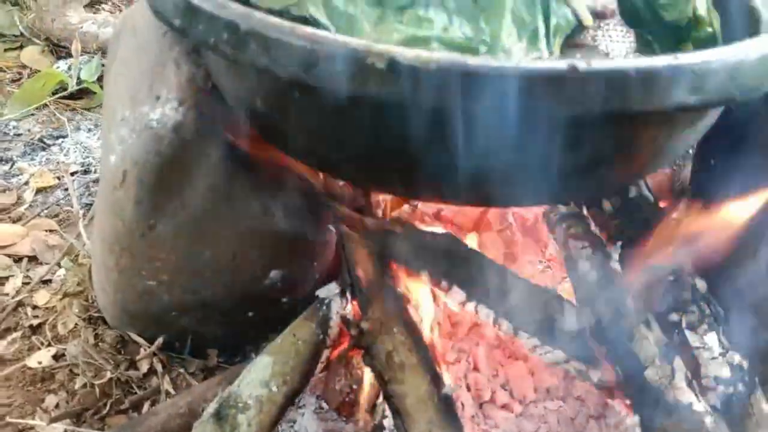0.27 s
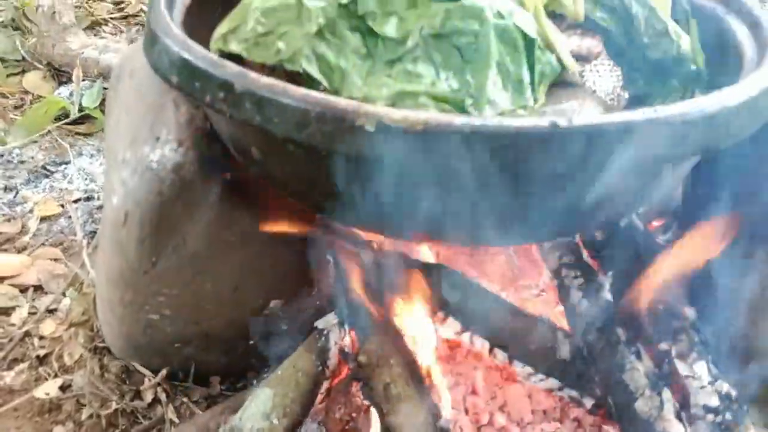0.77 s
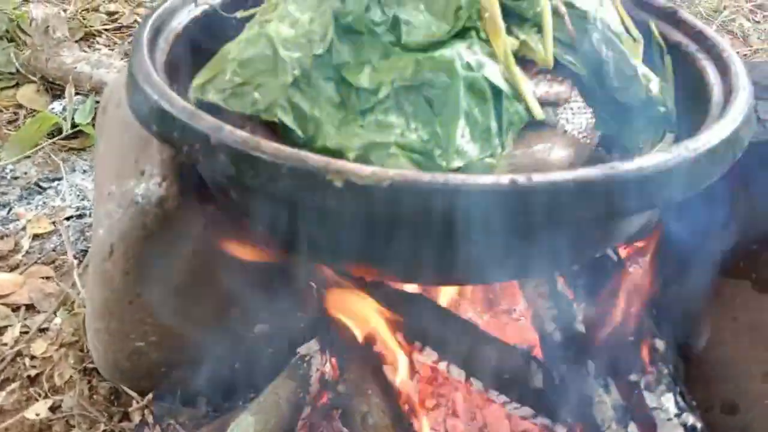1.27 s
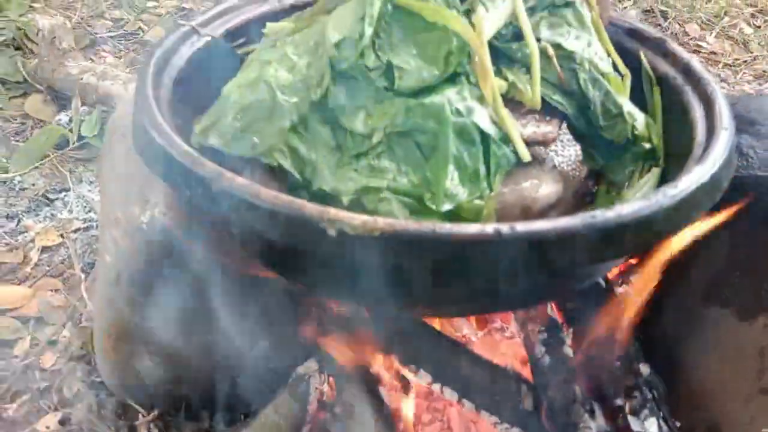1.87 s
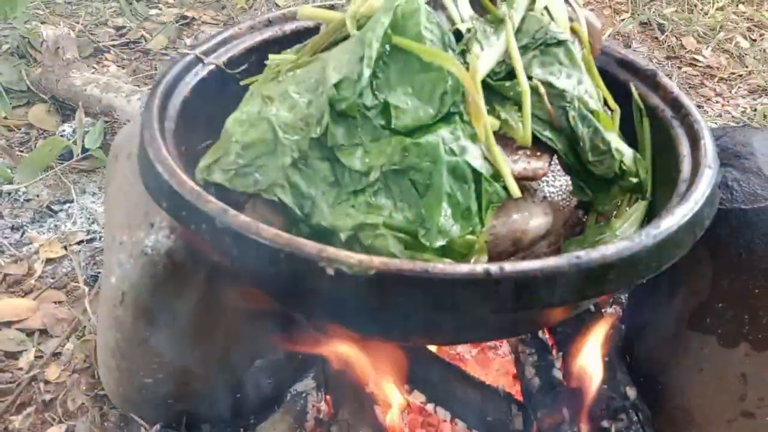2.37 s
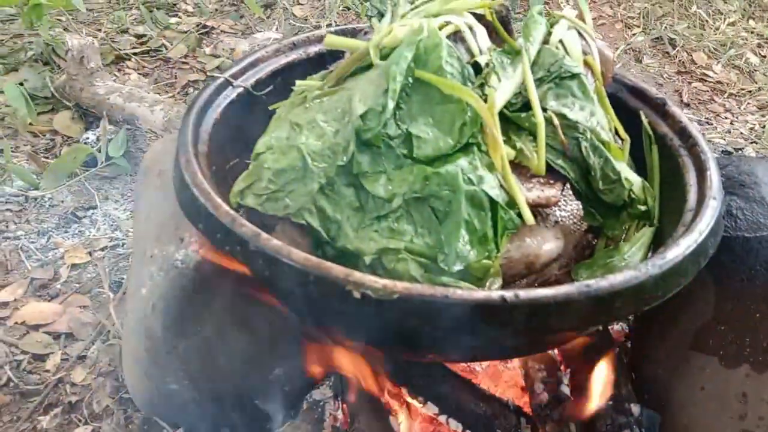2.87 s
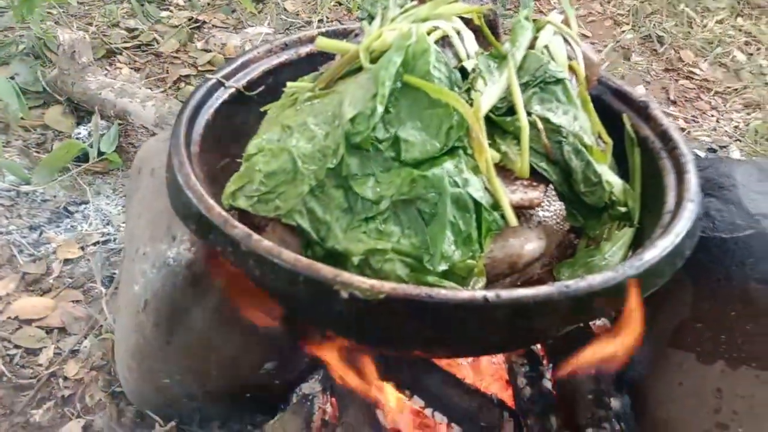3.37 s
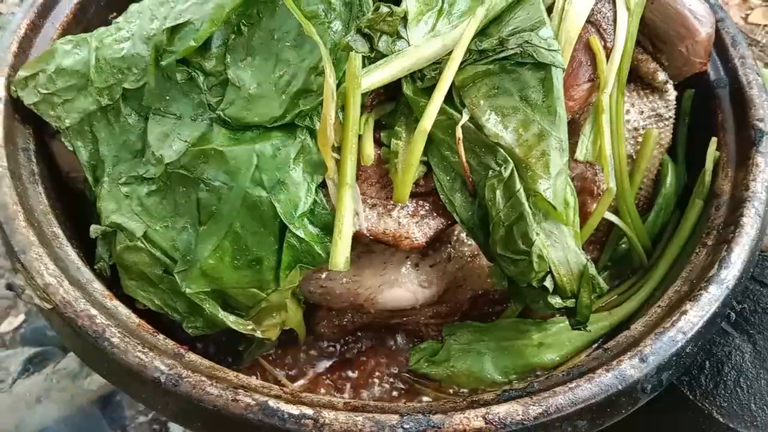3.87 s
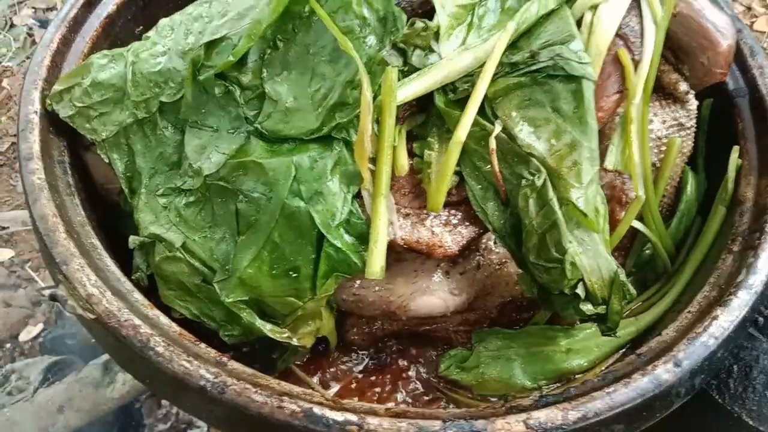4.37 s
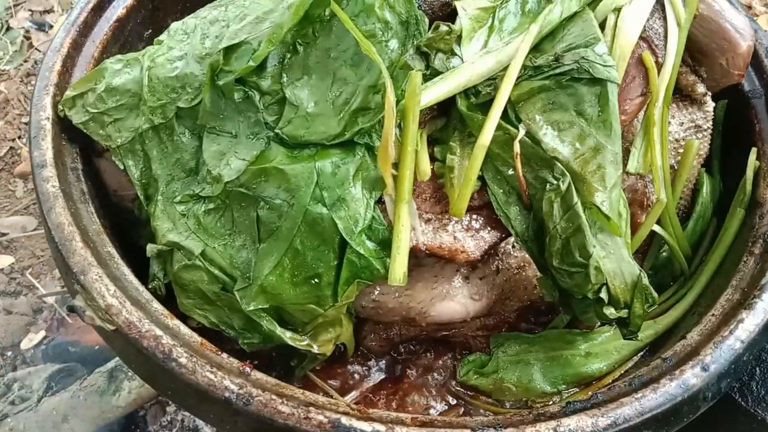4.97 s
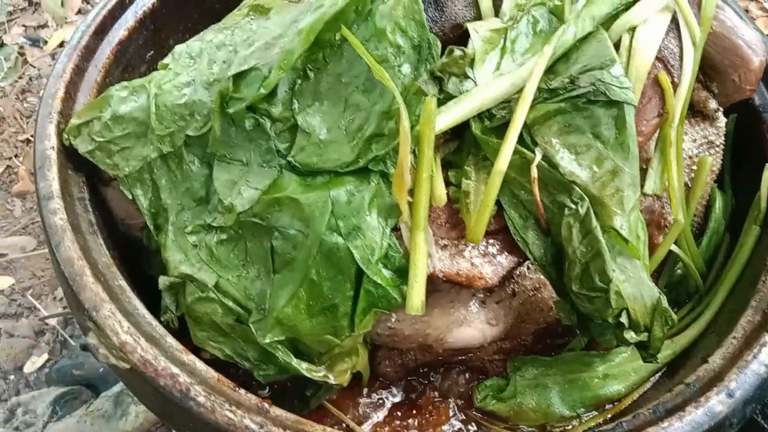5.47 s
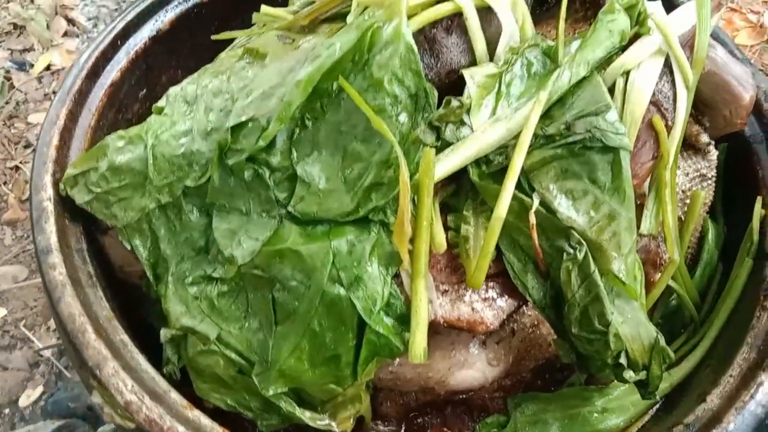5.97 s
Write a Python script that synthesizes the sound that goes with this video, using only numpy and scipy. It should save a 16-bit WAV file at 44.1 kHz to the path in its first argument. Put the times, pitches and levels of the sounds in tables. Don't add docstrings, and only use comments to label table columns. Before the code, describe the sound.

Faint uneven sizzling and soft flame flutter outdoors, a brief silent gap, then stronger seething with sharp spits, cracks and wet plops.

```python
import sys
import numpy as np
from scipy import signal
from scipy.fft import rfft, irfft, next_fast_len
from scipy.io import wavfile
from scipy.ndimage import uniform_filter1d, map_coordinates

SR = 44100
rng = np.random.default_rng(int(sys.argv[2]) if len(sys.argv) > 2 else 0)


def to_wav(s):
    ch = np.atleast_2d(s).T
    pcm = np.round(np.clip(ch, -1, 1) * 32767)
    wavfile.write(sys.argv[1], SR, pcm.astype(np.int16))


def linear_from_db(decibels):
    return 10 ** (np.asarray(decibels, float) / 20)


N = 275184

CUT_S, FADE_IN_S, FULL_S = 3.5445, 3.597, 3.8
STEP = 64
REFERENCE_DB = -46

# time in seconds, level in dB.
VIGOUR_SIDE = [(0, -51.5), (1.1, -51.5), (1.4, -48.5), (1.9, -48), (2.4, -47.5), (2.85, -45), (3.5, -44.5)]
VIGOUR_ABOVE = [(3.8, -40.5), (4.1, -38.5), (5.2, -38.5), (6.24, -37)]
# dB over the vigour, dB of growth per dB of vigour.
BOIL_BALANCE = [(-3, 0.94), (1, 0.64)]
SPATTER_BALANCE = [(-11, 1.23), (-8.5, 0.86)]
# middle in seconds,
# length in seconds, large bubbles in dB, small bubbles in dB.
SURGES = [(0.147, 0.036, 0.5, 3.5), (.19, .04, -4, -2.5), (.23, .04, 0.5, 0.5), (0.334, 0.042, 3, 4.5),
          (.46, .08, -1, 0.5), (0.61, 0.075, 4, 1.5), (.73, 0.066, 1, 4), (0.795, 0.035, 3, -0.5),
          (1.206, 0.067, 4, 2.5), (1.525, 0.022, 2, 5), (1.572, 0.12, -1.5, -2), (1.754, .11, 4, 2),
          (2.02, 0.066, 0.2, 4), (2.106, .08, 3, 2), (2.22, .06, -1.5, 0), (2.273, 0.046, 3, .3),
          (2.36, 0.062, 0.2, 5), (2.454, .05, 3, 0.5), (2.495, .05, -3.5, 1.5), (2.546, 0.076, 4, 0.5),
          (2.63, .06, -1.7, -0.5), (2.702, 0.035, -1.2, 1), (2.824, 0.083, -1.5, 1.1),
          (3.085, 0.073, 0.5, 0.5), (3.204, 0.065, -2.2, 3), (3.277, .12, -1.5, 0.5),
          (3.394, 0.12, -2, -5.5), (3.506, .1, -3, -0.5),
          (4.04, 0.099, -0.2, 2.1), (4.42, 0.14, 1, 0.5), (4.51, 0.058, -2, 0.63),
                (4.78, 0.039, 1.5, 2.1), (4.87, 0.024, 3, 2.7), (5.0, 0.075, .3, 2.1),
                (5.12, 0.084, 1.1, 1.3), (5.17, 0.036, -2.5, 2.4), (5.24, 0.051, 1.5, .3),
                (5.52, 0.09, 1.5, 1.5), (5.72, .08, -.6, 2.1), (5.93, .1, -0.1, 2.3),
                (5.99, .05, 1.5, 0.26), (6.06, 0.056, -1.2, 1.3)]
# middle in seconds, length in seconds, level in dB.
SHADES = [(.27, .05, -2.5), (0.475, .14, -4.5), (.87, 0.14, -4.5), (1.35, .1, -3), (1.705, .12, -6),
          (2.067, 0.066, -2), (2.68, .12, -2.5), (3.423, 0.083, -4), (5.715, 0.076, 2.1)]
# changes per second, depth in dB.
SEETHE = [(20, -0.82), (45, 0.05), (110, 0.8), (300, -0.43)]
# middle in seconds, length in seconds, level in dB.
GURGLES = [(.18, .05, 1), (.38, .05, 11), (.57, .08, 10), (.8, .15, 6), (0.957, .09, 9), (1.15, .16, 5),
           (1.56, .08, 0), (1.77, .15, 6), (1.94, .07, 12), (2.46, .08, 11), (2.71, .1, 8), (2.88, .07, 11),
           (2.983, .07, 15), (3.43, .1, 10), (3.53, .06, 6), (2.1, 0.11, 12), (3.15, 0.18, 0),
           (3.62, .06, -15), (4.28, 0.052, 1), (4.97, .08, -7), (5.147, 0.067, -11), (5.432, 0.095, 3),
           (5.543, 0.057, -13), (5.63, .08, 0)]
# pitch in Hz, width in Hz, level in dB.
POT_MODES = [(881, 200, -0.5), (1220, 127, -4), (1546, 292, -0.5), (1931, 160, -4), (2265, 57, -7)]
# frequency in Hz, density in dB per Hz.
HOLLOW_TONE = [(180, -62), (300, -39), (371, -34.5), (511, -6.5), (632, -1), (796, -3.5), (1080, 0),
               (1270, -1), (1380, -2.5), (1620, -1.5), (2170, -8.5), (2500, -14.5), (3250, -51.5),
               (5500, -120)]
# frequency in Hz, density in dB per Hz.
SPATTER_TONE_SIDE = [(2300, -35), (2480, 0), (2620, -20), (2800, -3), (3010, -15.5), (3270, -2),
                     (3500, -8.5), (3850, -1), (4150, -2), (4400, 0.5), (4600, -3.5), (4800, -37),
                     (5200, -53)]
SPATTER_TONE_ABOVE = [(2200, -49), (2560, -8), (2850, -2), (3090, -7.5), (3340, -1.5), (3960, 2),
                      (4400, 0.5), (4650, -4), (4900, -27), (5400, -50)]
# frequency in Hz, density in dB per Hz.
FIZZ_TONE_SIDE = [(4200, -40), (4800, -14.5), (5400, -5.5), (6050, -8.5), (7710, 0), (8710, -5.5),
                  (9350, -15), (10800, -10), (12500, -17.5), (13900, -36), (15000, -28), (15700, -16)]
FIZZ_TONE_ABOVE = [(4300, -39), (4900, -11), (5400, -3.5), (6300, -4.5), (7700, 3), (8200, 0), (9330, -12),
                   (10900, -9.5), (12700, -14.5), (13900, -34.5), (14900, -21.5), (15700, -22)]
# frequency in Hz, density in dB per Hz.
PRICKLE_TONE = [(8500, -40), (10000, -1), (12000, -8), (14000, -9), (15700, -21)]
# frequency in Hz, density in dB per Hz.
FLUTTER_TONE_SIDE = [(34, -38), (58, -16), (75, 2.5), (114, 6.5), (178, -16), (216, -15), (265, -16),
                     (300, -10), (390, -56), (660, -120)]
FLUTTER_TONE_ABOVE = [(34, -29), (58, -19), (97, 1), (124, 1.5), (147, -2.5), (211, -15.5), (242, -33),
                      (300, -39), (390, -48), (660, -120)]
# start in seconds, length in seconds, flutter in dB, throb in dB.
GUSTS = [(0, 0.028, -67, -110), (.17, .16, -82, -91), (.46, 0.58, -77.5, -85), (1.003, 0.64, -67.5, -62.5),
         (1.67, 0.12, -71, -73), (1.8, 0.14, -66.5, -66), (2.0, .17, -75, -76), (2.3, .09, -71, -86),
         (2.407, 0.29, -74, -97), (2.777, .06, -63, -89), (2.89, 0.46, -67, -88), (3.35, .18, -77, -95),
         (3.796, 0.2, -60, -60), (3.978, 0.22, -53.5, -64), (4.27, .13, -52, -88), (4.417, 0.089, -56, -72),
         (4.517, 0.455, -53, -60), (4.97, 0.12, -57, -69), (5.067, .17, -55.5, -62),
         (5.322, 0.13, -52.5, -68), (5.51, 0.039, -51.5, -80), (5.596, 0.19, -54, -58),
         (5.766, 0.25, -57, -56), (6.02, .19, -62.5, -60.5)]
# level beside in dB, level above in dB.
EMBERS = [(-84, -68.5), (-100, -82)]
# frequency in Hz, density in dB per Hz.
AIR_TONE = [(20, -30), (120, 3), (300, -5.5), (700, -4), (2000, -23), (15000, -8)]
# peak time in seconds, peak in dB, pitch in Hz, rise in ms.
SNAPS = [(.0386, -49, 4400, 2.5), (.153, -32, 3680, .8), (.1532, -42, 2300, .5), (.153, -41, 8000, .4),
         (.7297, -40, 5500, .6), (.7345, -32, 10000, .13), (1.5268, -37, 10500, .2), (2.072, -41, 2700, .5),
         (4.8673, -23, 4330, .8), (4.8672, -25, 7000, .12), (4.8676, -27, 9500, .3),
         (4.867, -31, 11800, .3), (4.8674, -29, 6000, .3), (4.8672, -31, 2900, .4), (4.868, -25, 1300, .5),
         (4.87, -26, 1800, .5), (4.8703, -30, 5500, 1), (5.087, -34, 3000, .5), (5.369, -27, 1300, .5),
         (5.3715, -25, 1300, .5), (6.0354, -23, 1700, .35)]
# peak time in seconds, peak in dB.
SPITS = [(.291, -38), (.3314, -37), (.7338, -35), (1.5268, -34), (1.801, -34), (1.8592, -34), (2.5051, -33),
         (2.5481, -31), (3.2121, -28), (4.4222, -20), (4.5007, -25), (4.8675, -22), (5.1791, -25),
         (5.3449, -24), (5.7138, -23), (5.9261, -24), (5.9415, -24)]
# start in seconds, level in dB, time to fall 60 dB in seconds.
PLOPS = [
    (1.583, -51.5, .07),
    (2.469, -53, 0.13),
    (2.97, -62, 0.091),
    (4.405, -32, 0.067),
    (5.367, -35.5, 0.11),
    (5.4, -43, 0.32),
    (6.036, -36.5, 0.054),
]
# frequency in Hz, density in dB per Hz.
PLOP_TONE = [(150, -27), (280, -8), (450, 4), (800, 4), (2000, 1.5), (3500, -6), (8000, -47)]


def unit(x):
    return x / np.sqrt(np.mean(x ** 2) + 1e-20)


def level_curve(table):
    seconds, db = np.transpose(table)
    return np.interp(np.arange(N) / SR, seconds, db)


def controls(rows):
    return [np.interp(np.arange(N), np.arange(len(row)) * STEP, row) for row in rows]


def bump(middle_s, length_s):
    t = np.arange(0, N, STEP) / SR
    return np.exp(-np.log(16) * ((t - middle_s) / length_s) ** 2)


def swells(table):
    return controls([sum(db * bump(middle, length) for middle, length, db in table)])[0]


def wobble(rate):
    knots = rng.standard_normal(int(N * rate / SR) + 4)
    return map_coordinates(knots, [np.arange(N) * rate / SR])


def beside():
    return np.arange(N) < (CUT_S + .03) * SR


def two_views(side, above):
    return np.where(beside(), unit(side), unit(above))


def coloured(x, tone):
    m = 2 * next_fast_len(N // 2 + 8192)
    hz, db = np.transpose(tone)
    log_hz = np.log(np.fft.rfftfreq(m, 1 / SR) + 1)
    gain = linear_from_db(np.interp(log_hz, np.log(hz + 1), db, -100, -100))
    cepstrum = irfft(np.log(gain), m)
    cepstrum[1:m // 2] *= 2
    cepstrum[m // 2 + 1:] = 0
    return irfft(rfft(x, m) * np.exp(rfft(cepstrum)), m)[:N]


def patchy(x, depth_db, size, window=256):
    z = signal.stft(x, nperseg=window)[2]
    field = uniform_filter1d(rng.standard_normal(z.shape), size[0], 0)
    field = uniform_filter1d(field, size[1], 1)
    return signal.istft(z * linear_from_db(depth_db * unit(field)), nperseg=window)[1][:N]


def bursts(per_s, spread_db, hiss):
    when, size, sign = rng.random((3, N))
    heights = linear_from_db(-spread_db * np.log(size + 2e-3))
    train = (when < per_s / SR) * heights * np.sign(sign - .5)
    return np.sqrt(1 - hiss) * unit(train) + np.sqrt(hiss) * rng.standard_normal(N)


def modes(x, table, waver_db, rate):
    out = np.zeros(N)
    for hz, width, db in table:
        b, a = signal.iirpeak(hz, hz / (1.265 * width), SR)
        ring = signal.lfilter(b, a, signal.lfilter(b, a, x))
        out += linear_from_db(db + waver_db * wobble(rate)) * ring
    return out


def frying_levels():
    vigour_db = np.where(beside(), level_curve(VIGOUR_SIDE), level_curve(VIGOUR_ABOVE))
    surges = SURGES
    large_db, small_db = controls(sum(np.outer(db, bump(s, length)) for s, length, *db in surges))

    def balanced(layer):
        views = [REFERENCE_DB + over + growth * (vigour_db - REFERENCE_DB) for over, growth in layer]
        return np.where(beside(), *views)

    boil_db = balanced(BOIL_BALANCE) + large_db
    spatter_db = balanced(SPATTER_BALANCE) + 0.63 * large_db + 0.32 * small_db + swells(SHADES)
    return boil_db, spatter_db, vigour_db + small_db


def boil(swarm):
    gurgle_db = swells(GURGLES)
    lumpy = patchy(swarm, 3.2, size=(2, 3), window=1024)
    wall = signal.butter(6, (705, 2520), "band", fs=SR, output="sos")
    through_wall = signal.sosfilt(wall, modes(lumpy, POT_MODES, waver_db=1.66, rate=17))
    gurgle = linear_from_db(gurgle_db - 24) * modes(swarm, [(653, 210, 0)], waver_db=1.5, rate=15)
    hollow = coloured(patchy(swarm, 2, size=(2, 4), window=1024), HOLLOW_TONE)
    deep = signal.sosfiltfilt(signal.butter(3, 620, fs=SR, output="sos"), hollow)
    return two_views(through_wall + gurgle, hollow + (linear_from_db(gurgle_db) - 1) * deep)


def spatter(swarm):
    hollowed = patchy(swarm, 4, size=(2, 7), window=1024)
    even = patchy(swarm, 2, size=(2, 4), window=1024)
    return two_views(coloured(hollowed, SPATTER_TONE_SIDE), coloured(even, SPATTER_TONE_ABOVE))


def fizz(swarm):
    high = patchy(swarm, 1.33, size=(5, 10))
    return two_views(coloured(high, FIZZ_TONE_SIDE), coloured(high, FIZZ_TONE_ABOVE))


def prickle(fizz_db):
    surge_db = fizz_db - uniform_filter1d(fizz_db, size=SR // 2)
    droplets = unit(coloured(bursts(2500, spread_db=3.2, hiss=.2), PRICKLE_TONE))
    return linear_from_db(-13.5 + 0.67 * surge_db) * droplets


def sizzle():
    boil_db, spatter_db, fizz_db = frying_levels()
    seethe_db = sum(depth_db * wobble(rate) for rate, depth_db in SEETHE)
    swarm = bursts(6000, spread_db=2.9, hiss=.45)
    low = swarm * linear_from_db(0.24 * seethe_db)
    bright = fizz(swarm * linear_from_db(seethe_db)) + prickle(fizz_db)
    return linear_from_db(boil_db + 1.3) * boil(low) + linear_from_db(spatter_db + 0.68) * spatter(low) + linear_from_db(fizz_db - 0.25) * bright


def draught():
    t = np.arange(0, N, STEP) / SR
    edge_s = 0.05

    def hold(start, length):
        inside_s = np.minimum(t - start, start + length - t)
        return np.clip(inside_s / edge_s + .5, 0, 1) ** 2

    murmur = [linear_from_db(np.where(t < FULL_S - .03, *db)) ** 2 for db in EMBERS]
    gusts = sum(np.outer(linear_from_db(db) ** 2, hold(start, length)) for start, length, *db in GUSTS)
    return controls(np.sqrt(murmur + gusts))


def flames():
    flutter_gain, throb_gain = draught()
    gas = rng.standard_normal(N) * linear_from_db(1.5 * wobble(26))
    flutter = two_views(coloured(gas, FLUTTER_TONE_SIDE), coloured(gas, FLUTTER_TONE_ABOVE))
    throb_hz = 45 + 6 * wobble(30)
    throb = np.sqrt(2) * np.sin(2 * np.pi * np.cumsum(throb_hz) / SR) * linear_from_db(2.5 * wobble(26))
    return flutter_gain * flutter + throb_gain * throb


def air():
    level_db = np.where(np.arange(N) / SR < FADE_IN_S, -68, -62)
    return linear_from_db(level_db) * unit(coloured(rng.standard_normal(N), AIR_TONE))


def pops(events):
    out = np.zeros(N + SR)
    t = np.arange(900) / SR
    for peak_s, db, hz, rise_ms in events:
        rises = 1000 * t / rise_ms
        swell = rises ** 2 * np.exp(2 - 2 * rises)
        ring = np.sin(2 * np.pi * (hz * t + rng.random()))
        start = round((peak_s - rise_ms / 1000) * SR)
        out[start:start + len(t)] += linear_from_db(db) * swell * ring
    return signal.sosfilt(signal.butter(2, 700, "high", fs=SR, output="sos"), out[:N])


def snaps():
    return pops(SNAPS)


def spits():
    pitch_hz, scatter_hz, rise_ms = 7550, 250, .7
    return pops([(s, db, pitch_hz + scatter_hz * rng.normal(), rise_ms) for s, db in SPITS])


def plops():
    t = np.arange(N) / SR
    shape = np.zeros(N)
    for start, db, t60 in PLOPS:
        attack = np.clip((t - start) / 0.0019, 0, 1)
        shape += attack * linear_from_db(db - 60 * np.maximum(t - start, 0) / t60)
    return shape * unit(coloured(bursts(900, spread_db=-3.0, hiss=0.89), PLOP_TONE))


def scene():
    t = np.arange(N) / SR
    trail = linear_from_db(-29) * np.clip((CUT_S + .024 - t) / .014, .1, 1)
    fade_in = np.clip((t - FADE_IN_S) / (FULL_S - FADE_IN_S), 0, 1) ** 1.07
    edit = np.where(t < CUT_S, 1, np.maximum(trail, fade_in))
    mix = sizzle() + flames() + air() + snaps() + spits() + plops()
    noise_floor = linear_from_db(-92) * rng.standard_normal(N)
    return (edit * mix + noise_floor)[None]


def low_pass(x):
    return signal.sosfilt(signal.butter(12, 15880, fs=SR, output="sos"), x)


def record(dry):
    spectrum = rfft(dry) * (np.fft.rfftfreq(N, 1 / SR) < 15500)
    return low_pass(irfft(spectrum, N))


dry = scene()
out = record(dry)
to_wav(out)
```